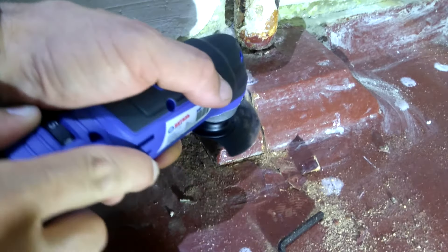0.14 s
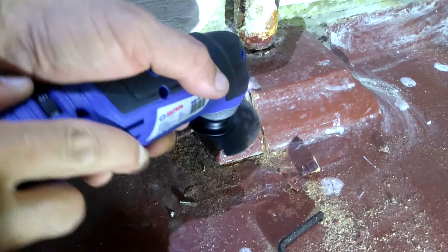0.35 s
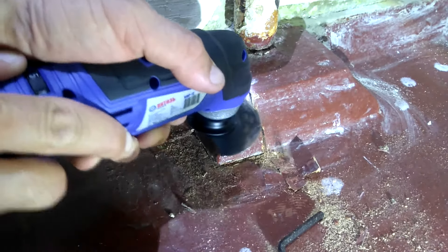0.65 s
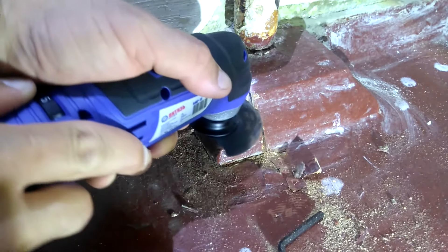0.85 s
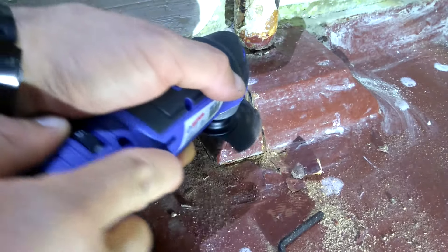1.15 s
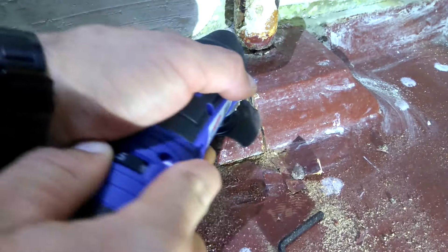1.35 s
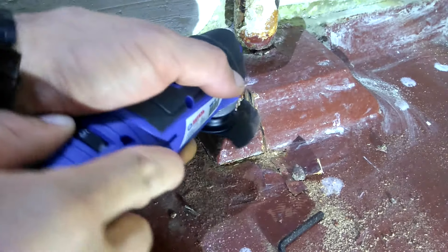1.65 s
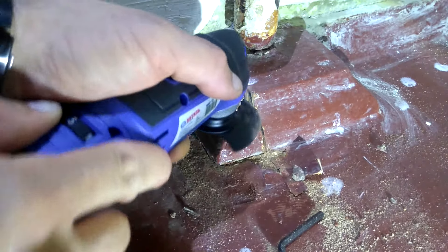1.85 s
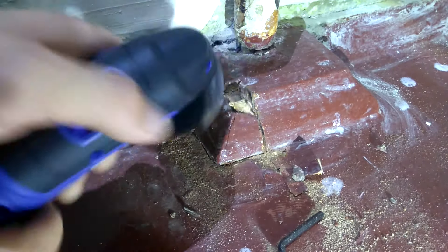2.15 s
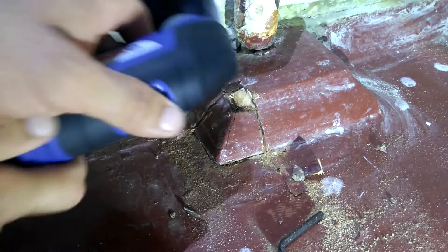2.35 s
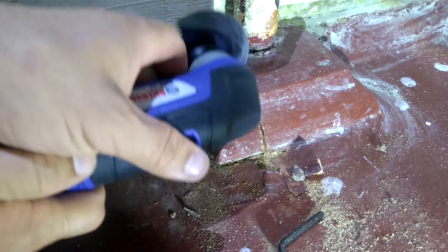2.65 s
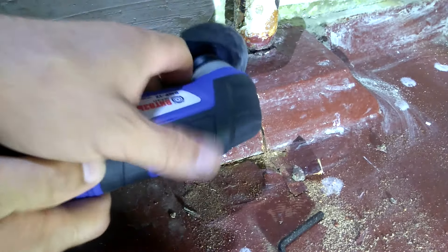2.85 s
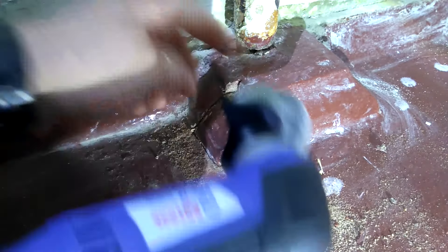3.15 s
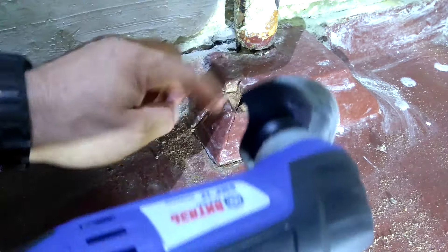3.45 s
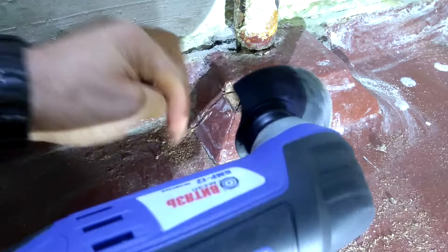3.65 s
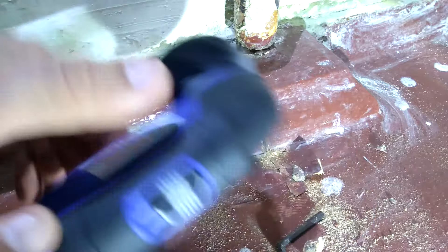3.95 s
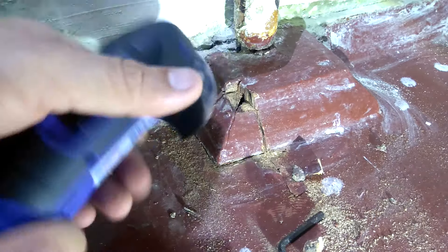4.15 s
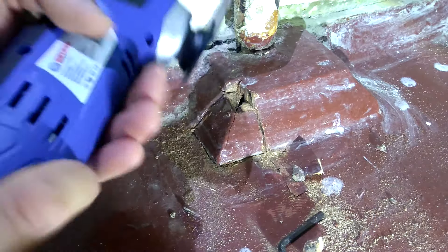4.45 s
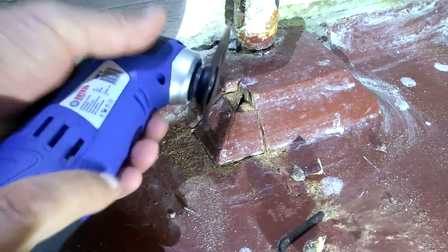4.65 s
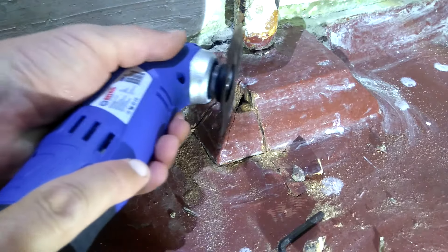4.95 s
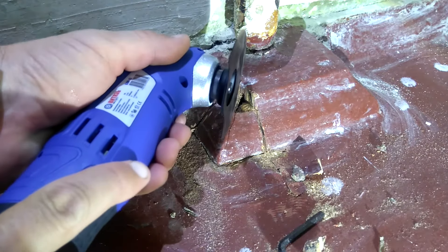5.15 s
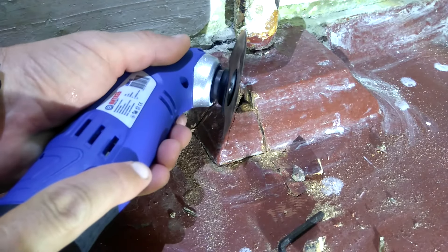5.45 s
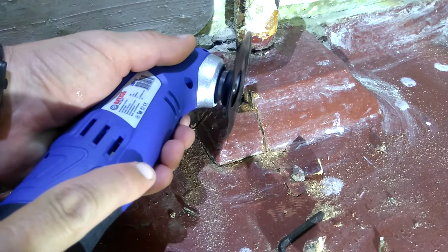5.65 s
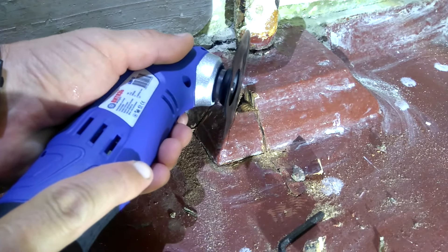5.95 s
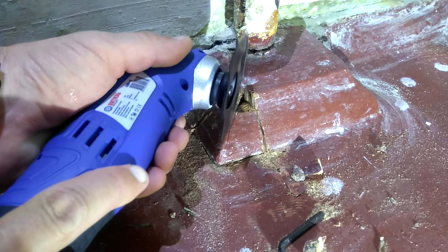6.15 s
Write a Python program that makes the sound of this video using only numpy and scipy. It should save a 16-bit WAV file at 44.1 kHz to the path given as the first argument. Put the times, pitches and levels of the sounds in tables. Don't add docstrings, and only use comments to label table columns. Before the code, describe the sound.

A handheld oscillating tool growls roughly as its blade bites into a board, then breaks free and races up to a steady whining buzz.

```python
import sys
import numpy as np
from scipy import signal
from scipy.fft import rfft, irfft, next_fast_len
from scipy.io import wavfile

SR = 44100
rng = np.random.default_rng(int(sys.argv[2]) if len(sys.argv) > 2 else 0)


def inscribe(sig):
    pcm = np.round(np.clip(np.atleast_2d(sig).T, -1, 1) * 32767)
    wavfile.write(sys.argv[1], SR, pcm.astype(np.int16))


def volts_from_db(level):
    exponent = np.asarray(level, float) / 20
    return 10 ** exponent


N = 277344
HOP = 64

# frequency in Hz, likeness from 0 to 1, left over right in dB,
# wander of the overtones from 0 to 1.
PAIR = [(150, .97, 0, .02), (400, .99, 3.5, .03), (900, .88, 0, .04), (2500, .8, .5, .12),
        (5200, .75, .5, .14), (9000, .5, -5.5, .55), (14000, .45, -5.5, .75)]
# time in seconds, delay in samples.
LAG = [
    (0, 7.2),
    (2, 8.73),
    (3.5, 10.47),
    (4.5, 13.6),
    (6.29, 12.08),
]


def rms_one(x):
    return x / np.sqrt(np.mean(np.abs(x) ** 2) + 1e-20)


def slow_times():
    return np.arange(N // HOP + 2) * HOP / SR


def in_time(rows):
    seconds, *columns = np.transpose(rows)
    return [np.interp(slow_times(), seconds, column) for column in columns]


def every_sample(slow):
    return np.interp(np.arange(N) / HOP, np.arange(len(slow)), slow)


def at_hz(points, hz, column=1):
    table = np.array(points)
    return np.interp(np.log(hz + 1), np.log(table[:, 0]), table[:, column])


def drift(rate_hz, size):
    r = np.exp(-2 * np.pi * rate_hz * HOP / SR)
    white = rng.standard_normal((*size, N // HOP + 1002))
    settled = signal.lfilter([1], [1, -2 * r, r * r], white)[..., 1000:]
    return rms_one(settled)


def bumps(rows):
    seconds, half = np.transpose(rows)[:2, :, None]
    return np.exp(-np.abs((slow_times() - seconds) / half) ** 3)


def parts(hz):
    edges_hz = (290, 1100, 6200)
    above = [np.clip(.5 + 6 * np.log(hz / edge + 1e-9), 0, 1) for edge in edges_hz]
    return np.array([1 - above[0], above[0] - above[1], above[1] - above[2], above[2]])


def loading(speed_hz):
    free_hz, full_load_sag_hz = 243.2, 35
    return np.clip((free_hz - speed_hz) / full_load_sag_hz, 0, 1)


def loudness(load, knock_db):
    # time in seconds, seat from -2 (skidding) to 1 (buried),
    # lift in dB of the double beat when both strokes bite.
    bite = [(0, 0.5, 9.5), (.12, 0.9, 16), (.22, 0.9, 16), (.4, 0.1, 7), (.55, 0, 8), (.72, 0.3, 12),
            (.79, 0, 3.5), (.87, -2, 1), (.98, -1.3, 15.5), (1.07, -0.6, 9.5), (1.24, .7, 18),
            (1.33, 0.45, 0), (1.49, 0.74, 5.5), (1.56, -0.24, 15), (1.69, 0, 1), (1.76, 0.3, 25.5),
            (1.87, 0.5, -3), (1.95, -1.5, 7)]
    # time in seconds, nearness in dB, roll from -1 (housing shown) to 1
    pose = [(2.15, -1.5, 0.8, 0), (2.28, 3, -1.6, -2.5), (2.47, 1, -0.47, -0.94), (2.68, -1, -0.67, -0.9),
            (3.15, -2, -1.35, -0.16), (3.31, .5, 0.44, 0), (3.66, -1, -1.2, 0.35), (3.9, -1.5, -0.31, 0.84),
            (4.2, 0.5, -0.77, -0.8), (4.34, 2.5, 0.025, -0.8), (4.57, -1, 0.23, -0.4),
            (4.75, -1.5, 0.0033, 0.4), (5.17, 0, 1.8, 0.2), (5.33, -2, -1, 0.06), (5.53, 0, 1.8, 0),
            (5.78, -2.5, -0.29, 1.3), (6.01, -0.5, 0.9, 0), (6.29, -3, -0.84, 0)]
    cut_levels, per_seat = (-24, -17, -16, -26), (5, 2.5, -1, -4)
    free_levels, per_roll, per_low = (-40.5, -28.5, -14.5, -20), (0.5, 0.5, -1.04, 2.5), (1.5, 6, 1.5, 0)
    knock_share = (1.0, 0.42, 0.15, 0.3)
    seat, both_strokes_db = in_time(bite)
    near_db, roll, low = in_time(pose)
    cut_db = np.array(cut_levels)[:, None] + np.outer(per_seat, seat)
    cut_db[1] += 0.19 * both_strokes_db
    free_db = np.array(free_levels)[:, None] + near_db + np.outer(per_roll, roll) + np.outer(per_low, low)
    levels_db = load * cut_db + (1 - load) * free_db + np.outer(knock_share, knock_db)
    double_db = load * both_strokes_db + (1 - load) * 3.5
    return levels_db, double_db


def colour(hz, speed_hz, double_db):
    # frequency in Hz, dB.
    cutting = [(190, 36), (380, 5.5), (570, 10), (760, 8), (950, 8), (1250, -10.5), (1600, -8),
               (2300, -7.5), (3300, -9), (4100, -16.5), (5000, -21.5), (7200, -25.5), (14000, -43)]
    lifted = [(243, -9), (486, -14.5), (730, -2.5), (1200, -8), (1500, -9), (2150, -3.5), (2800, -2),
              (4000, -13), (5200, -5.5), (6300, -11), (8000, -11.5), (10600, -14), (12000, -27),
              (14000, -13.5)]
    facing = [(243, -23), (486, -11.5), (730, -2), (970, -6), (1450, 5.5), (2150, 1), (3400, 3),
              (4300, -2.5), (5200, 5), (6300, -7.5), (7700, 0), (10600, -8), (12000, -18.5), (14000, -0.5)]
    # time in seconds, share from 0 to 1.
    facing_share = [
        (0, 0.93),
        (4.1, 0.08),
        (4.7, 1),
        (6.29, 0.97),
    ]
    # time in seconds, spread in seconds, frequency in Hz, dB.
    hand_swells = [(.57, 0.12, 1570, -19), (.54, 0.12, 2500, -8), (.9, 0.14, 930, -10),
                   (1.41, 0.25, 900, 5), (2.25, 0.25, 1200, -8.5), (2.25, 0.036, 5650, 13.5),
                   (2.32, .15, 3014, 29), (2.6, .13, 2530, -27), (2.67, 0.13, 1867, 15.5),
                   (3.36, 0.42, 2160, -8.5), (3.57, 0.42, 5710, -21), (3.6, 0.21, 5835, 7.5),
                   (3.66, 0.12, 1690, -11.5), (4.05, 0.62, 5196, 11.5), (4.08, 0.1, 4170, 5.5),
                   (4.14, 0.25, 1462, 3.5), (4.23, 0.42, 2690, 4), (4.38, 0.074, 9755, 11),
                   (4.41, 0.12, 1970, 13), (4.5, 0.42, 3020, -20), (4.77, 0.65, 5500, 4),
                   (4.8, 0.21, 4260, 29), (4.8, 0.12, 5100, -12), (4.9, 0.63, 10680, 15),
                   (5.01, 0.085, 9765, 10), (5.04, 0.13, 2760, -18.5), (5.4, 0.29, 5420, -12.5),
                   (5.55, 0.36, 7020, 5), (5.79, 0.086, 1210, 7.5), (5.9, 0.65, 5155, 7)]
    # time in seconds, spread in seconds, frequency in Hz, dB.
    board_swells = [(0.089, .1, 670, 11), (0.081, 0.092, 1020, -13), (0.53, 0.22, 790, 9),
                    (0.42, 0.028, 1900, 7), (.92, 0.034, 1100, 6), (1.1, .1, 850, 9), (1.2, 0.068, 2200, 6),
                    (1.62, 0.056, 560, 17), (1.92, 0.05, 1000, 7), (2.92, 0.021, 710, 10),
                    (2.83, 0.087, 1580, 11), (3.75, 0.15, 972, 7), (4.0, 0.093, 2000, 0.5),
                    (2.47, .15, 730, -22), (2.13, 0.048, 510, -15), (2.54, 0.16, 570, 1),
                    (1.6, .2, 1080, -5), (2.2, 0.22, 1460, 2.5), (4.1, 0.085, 1700, -3.5),
                    (4.79, .1, 3400, 4), (3.8, 0.14, 4150, -3), (5.41, 0.21, 3650, 6),
                    (4.18, .12, 5500, 13), (3.79, 0.086, 5350, 6.5), (1.55, 0.049, 2080, 10),
                    (0.054, 0.067, 2030, 12), (0.55, 0.18, 2200, 1.5), (5.75, 0.1, 487, 6),
                    (5.25, 0.1, 1216, 5)]
    load = loading(speed_hz)
    turned = np.clip(in_time(facing_share)[0], 0, 1)
    free = (1 - turned) * at_hz(lifted, hz) + turned * at_hz(facing, hz)
    heights_db = load * at_hz(cutting, hz) + (1 - load) * free
    heights_db[1] += double_db
    now, width_hz = slow_times(), 75
    for seconds, spread, centre_hz, db in hand_swells + board_swells:
        in_moment = ((now - seconds) / spread) ** 2
        in_band = ((hz - centre_hz) / width_hz) ** 2
        heights_db += db * np.exp(-.5 * in_moment - .5 * in_band)
    return heights_db


def buzz(turn, speed_hz, levels_db, double_db, flutter, count=62):
    order = np.arange(1, count + 1)[:, None]
    hz = order * speed_hz
    alike = np.clip(at_hz(PAIR, hz), 0, 1)
    wander = np.clip(at_hz(PAIR, hz, column=3), 0, 1)
    slow_part = drift(2.2, (2, 3, count))
    fast_part = (flutter + hz / 5000) * drift(16.0, (2, 3, count))
    a, b = slow_part + fast_part
    shared, left, right = (a + 1j * b) / np.sqrt(2)
    start = np.exp(2j * np.pi * rng.random((count, 1)) * (order > 4))
    common = np.sqrt(alike) * (np.sqrt(1 - wander) * start + np.sqrt(wander) * shared)
    late = np.exp(-2j * np.pi * hz * in_time(LAG)[0] / SR)
    tilt = volts_from_db(at_hz(PAIR, hz, column=2) / 2)
    left_side = (common + np.sqrt(1 - alike) * left) * tilt
    right_side = (common * late + np.sqrt(1 - alike) * right) / tilt
    both = np.array([left_side, right_side])
    both = both * volts_from_db(colour(hz, speed_hz, double_db)) * (hz < 14700)
    share = parts(hz)
    power = np.sum(share * np.abs(both.mean(axis=0)) ** 2, axis=1) / 2
    part_gain = volts_from_db(levels_db) / np.sqrt(power + 1e-20)
    both = both * np.sum(share * part_gain[:, None], axis=0)
    out, step, spin = np.zeros((2, N)), np.exp(1j * turn), 1
    for k in range(count):
        spin = spin * step
        for side in (0, 1):
            out[side] += (every_sample(both[side, k]) * spin).real
    return out


def stereo_noise(spectrum, shares):
    size = next_fast_len(N)
    hz = np.arange(size // 2 + 1) * SR / size
    common, left, right = rfft(rng.standard_normal((3, size)))
    alike = np.clip(.72 * at_hz(PAIR, hz), 0, 1)
    tilt = volts_from_db(at_hz(PAIR, hz, column=2) / 2)
    late = np.exp(-2j * np.pi * hz * np.mean(LAG, axis=0)[1] / SR)
    left_side = (np.sqrt(alike) * common + np.sqrt(1 - alike) * left) * tilt
    right_side = (np.sqrt(alike) * common * late + np.sqrt(1 - alike) * right) / tilt
    shaped = np.array([left_side, right_side]) * volts_from_db(at_hz(spectrum, hz))
    return [rms_one(irfft(shaped * share, size)[:, :N]) for share in shares(hz)]


def pulsing(turn, gains_db, noises):
    stroke = 1 - 0.11 * np.cos(turn) + 0.71 * np.cos(2 * turn)
    count = len(noises)
    flicker_db = drift(20.0, (count,)) * 1.6 + drift(16.0, (1,)) * 1.2 + drift(2.5, (count,)) * 1.3
    gains = volts_from_db(gains_db + flicker_db)
    return stroke * sum(every_sample(gain) * noise for gain, noise in zip(gains, noises))


def grit(turn, lines_db, share_db):
    # frequency in Hz, dB per Hz.
    grit_curve = [(90, -40), (150, -2), (500, -3), (1200, -4), (2000, 1), (4300, -1), (5500, -5),
                  (6500, -10), (10000, -11), (14300, -17)]
    return pulsing(turn, lines_db + share_db, stereo_noise(grit_curve, parts))


def board_ring():
    # time in seconds, half length in seconds, level in dB.
    shudders = [
        (1.974, 0.078, -25.5),
        (2.16, 0.05, -35.5),
    ]
    ring_hz, width_hz = 358, 22
    r, w = np.exp(-np.pi * width_hz / SR), 2 * np.pi * ring_hz / SR
    resonance = [1, 0, -1, 1, -2 * r * np.cos(w), r * r]
    ring = signal.sosfilt([resonance] * 2, rng.standard_normal(N))
    gain = volts_from_db(np.array(shudders)[:, 2]) @ bumps(shudders)
    return rms_one(ring) * every_sample(gain)


def whirr_bands(hz):
    blade = parts(hz)[3]
    return [1 - blade, blade]


def whirr(turn, lines_db, share_db):
    # frequency in Hz, dB per Hz.
    whirr_curve = [(90, -30), (200, -18), (1000, -20), (2150, -19), (2800, -7), (4300, -6), (5250, 0),
                   (6400, -14), (7700, -7), (9300, -8), (10700, -9), (12000, -16), (14300, -14)]
    return pulsing(turn, lines_db[2:] + share_db, stereo_noise(whirr_curve, whirr_bands))


def rumble(board_db):
    # frequency in Hz, dB per Hz.
    rumble_curve = [(12, -30), (20, -9), (54, -11), (150, -9), (200, -28), (330, -120)]
    size = next_fast_len(N)
    shape = volts_from_db(at_hz(rumble_curve, np.arange(size // 2 + 1) * SR / size))
    noise = rms_one(irfft(rfft(rng.standard_normal((2, size))) * shape, size)[:, :N])
    return noise * every_sample(volts_from_db(-57 + 0.91 * (board_db + 19.0)))


def scene():
    # time in seconds, blade swings per second.
    motor_speed = [(0, 198), (.13, 189.3), (.22, 192.1), (.38, 191.8), (.49, 181.7), (.96, 181.2),
                   (1.14, 190.3), (1.45, 187), (1.8, 176.5), (1.87, 185), (1.93, 201.5), (2.06, 231),
                   (2.11, 239), (2.19, 242), (2.4, 243), (2.9, 242.2), (4.4, 244), (6.29, 244)]
    # time in seconds, half length in seconds, loss of speed in Hz.
    presses = [
        (.778, .055, 12),
        (1.3, .05, 2.6),
        (1.62, .085, 15),
        (2.92, .06, 7),
        (4.5, .07, .7),
        (5.34, .1, 2.2),
        (5.79, .08, 1.7),
        (6.25, .09, 4),
    ]
    # time in seconds, half length in seconds,
    # scrape in dB against the tones, knock into the board in dB.
    grazes = [(0.465, 0.043, -12, 0.5), (0.893, 0.099, -6.5, 0.5), (1.632, 0.097, -5, 5.5),
              (1.8, 0.053, -19, 0), (1.979, .09, 6, 1.5), (2.068, 0.042, 4, -1), (2.813, 0.0083, 1, 13),
              (2.807, .04, 0, 2.5), (2.883, 0.039, 4.5, 20.5), (2.96, 0.05, -0.5, 5.5),
              (5.317, 0.079, -18, 6.5), (5.715, .015, -3, -2), (6.237, 0.21, -15, 8.5)]
    # time in seconds, half length in seconds, dB.
    swings = [
        (3.05, 0.078, 4.5),
        (4.146, 0.074, -2),
        (4.45, 0.066, 0.5),
        (4.67, 0.05, 2),
        (5.317, 0.12, 3),
        (5.818, 0.19, 1),
        (6.157, .12, 2),
    ]
    speed_hz = in_time(motor_speed)[0] - np.array(presses)[:, 2] @ bumps(presses)
    load, grazing = loading(speed_hz), bumps(grazes)
    graze_db, knock_db = np.array(grazes)[:, 2:].T
    scrape = volts_from_db(-25) + load ** 2 * volts_from_db(-3.5) + volts_from_db(graze_db) @ grazing
    scrape_db = 20 * np.log10(scrape)
    levels_db, double_db = loudness(load, knock_db @ grazing)

    uneven = (0.000476 + 0.00203 * scrape) * drift(22.5, ())
    turn = 2 * np.pi * np.cumsum(every_sample(speed_hz * (1 + uneven))) / SR

    grit_db = scrape_db + np.array((-26, -17.5, -1.5, 4.5))[:, None]
    whirr_db = np.array((-10, -3.5))[:, None] - 6 * load + np.array(swings)[:, 2] @ bumps(swings)
    lines_db = levels_db - 10 * np.log10(1 + volts_from_db(grit_db) ** 2)

    flutter = 0.3 + 2.0 * volts_from_db(np.minimum(scrape_db, 3))
    tool = buzz(turn, speed_hz, lines_db, double_db, flutter) + grit(turn, lines_db, grit_db)
    return tool + board_ring() + whirr(turn, lines_db, whirr_db) + rumble(levels_db[1])


def roll_off(x):
    return signal.sosfilt(signal.butter(12, 14970, fs=SR, output="sos"), x)


def record(dry):
    rounded = dry / (1 + (dry / .72) ** 4) ** .25
    treble_cut = signal.cheby2(18, 70, 14640, fs=SR, output="sos")
    mix = signal.sosfilt(treble_cut, rounded)
    return roll_off(mix)


dry = scene()
out = record(dry)
inscribe(out)
```